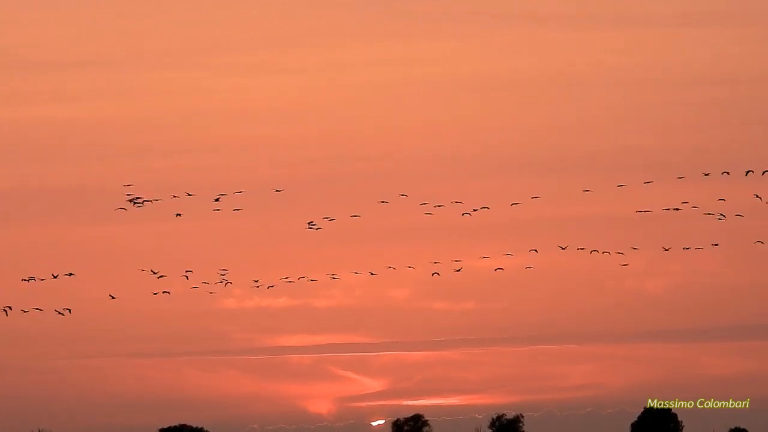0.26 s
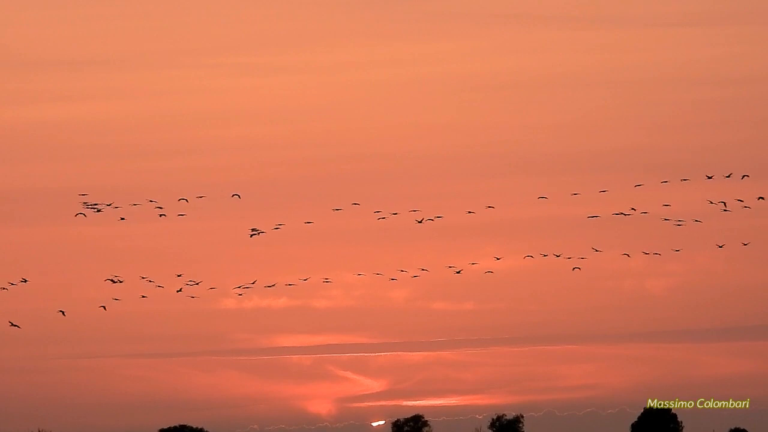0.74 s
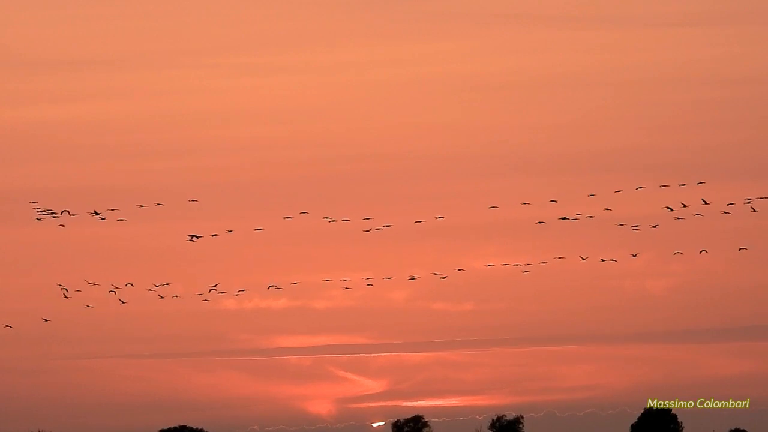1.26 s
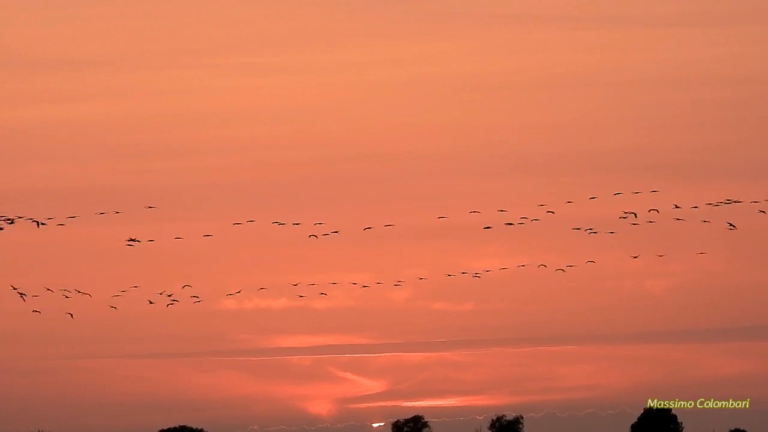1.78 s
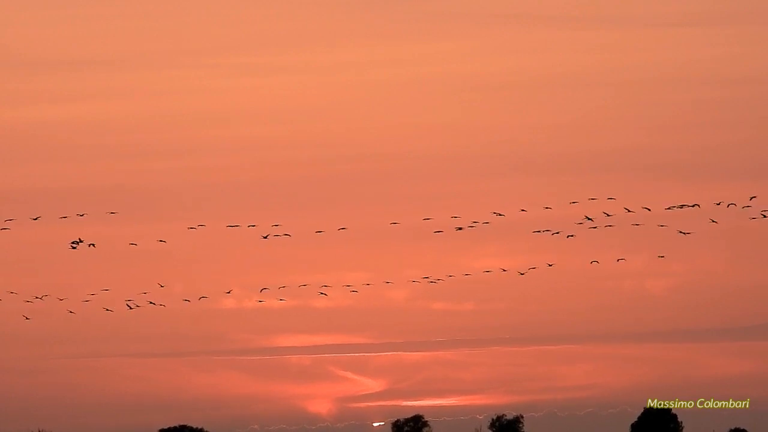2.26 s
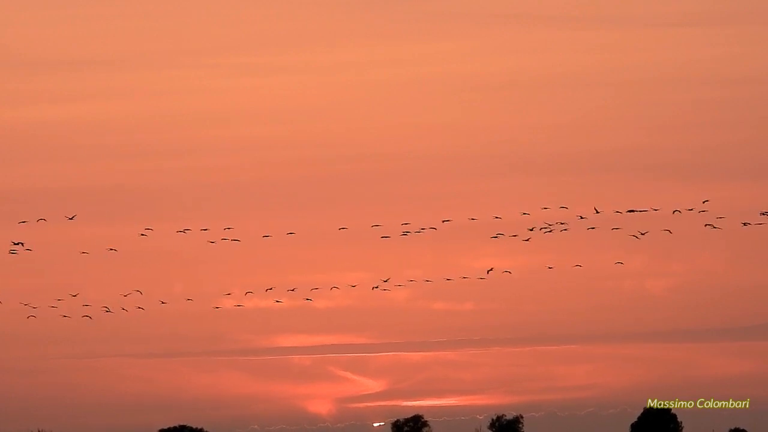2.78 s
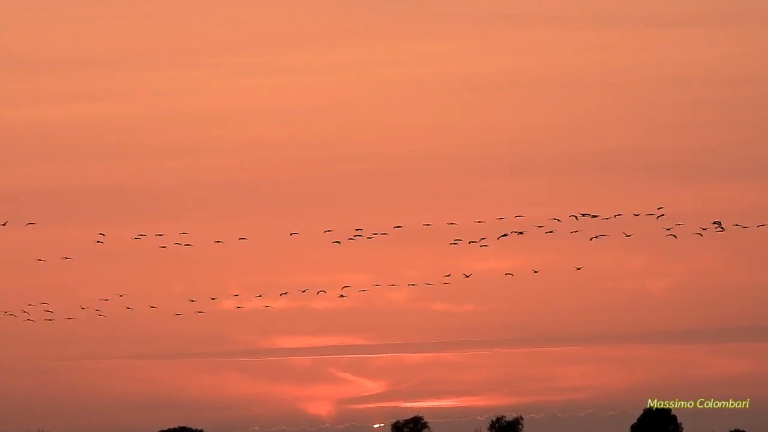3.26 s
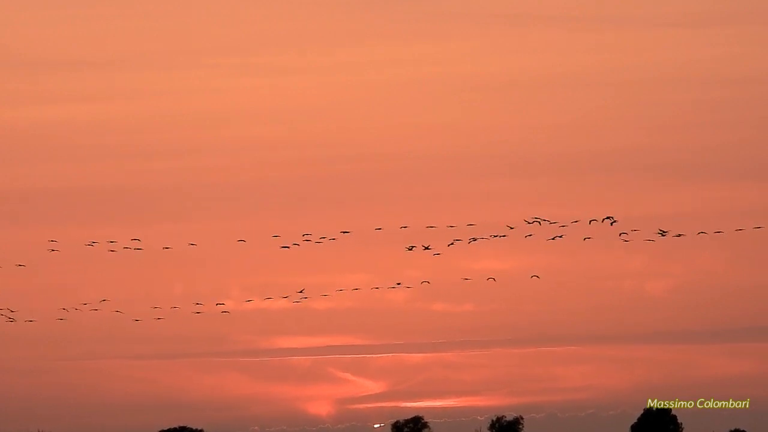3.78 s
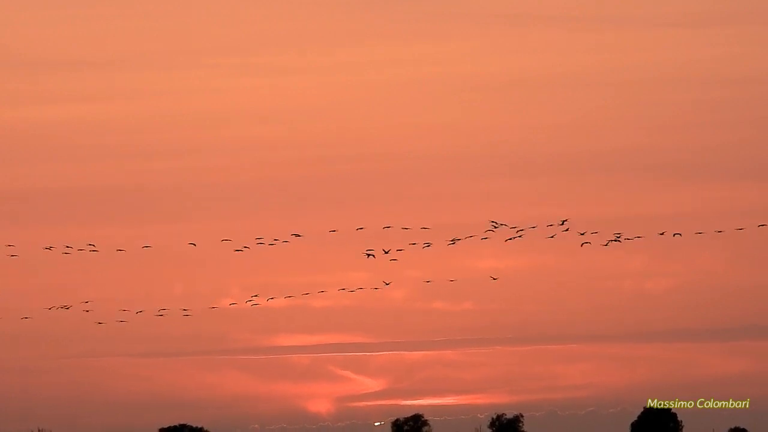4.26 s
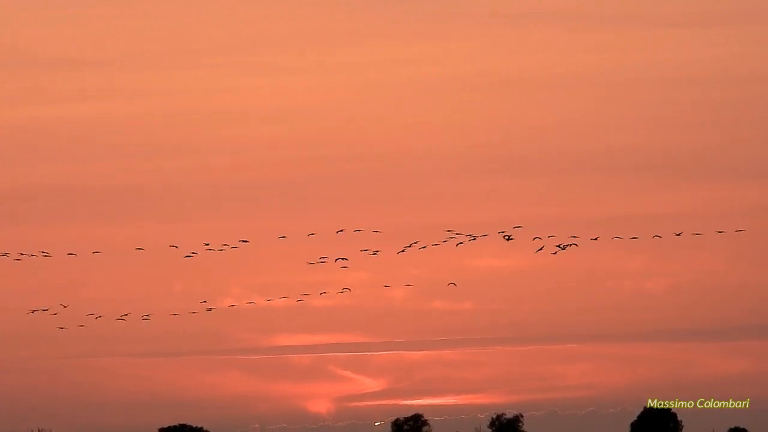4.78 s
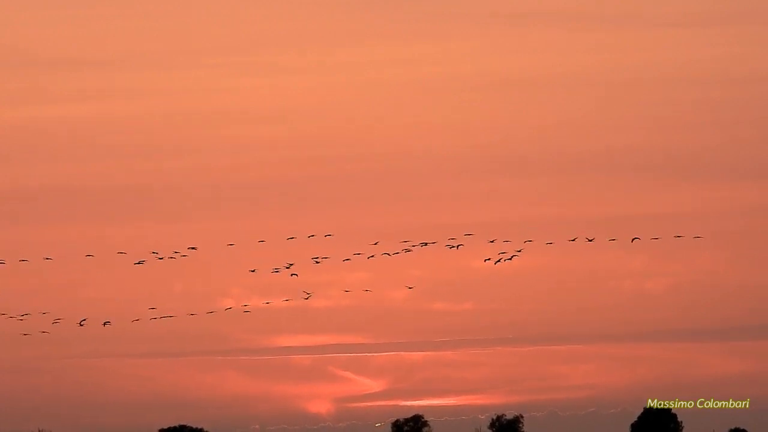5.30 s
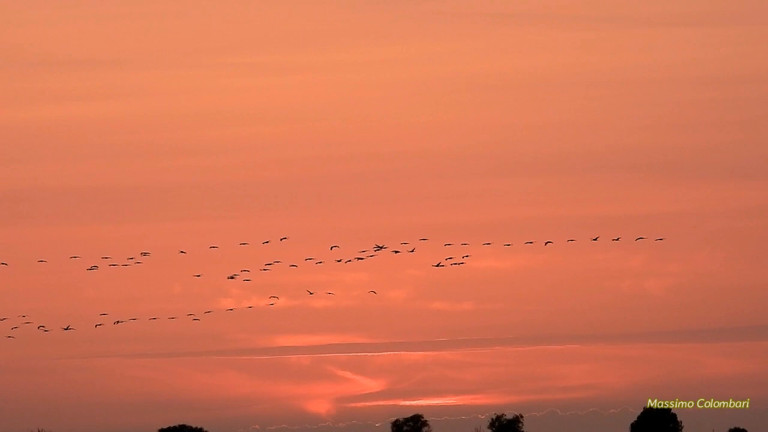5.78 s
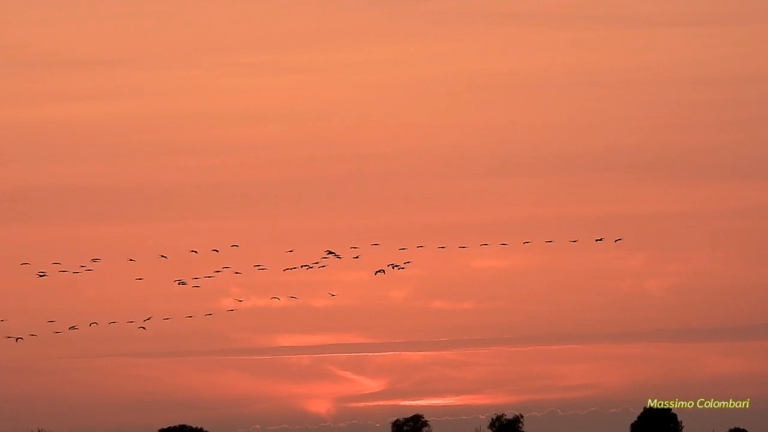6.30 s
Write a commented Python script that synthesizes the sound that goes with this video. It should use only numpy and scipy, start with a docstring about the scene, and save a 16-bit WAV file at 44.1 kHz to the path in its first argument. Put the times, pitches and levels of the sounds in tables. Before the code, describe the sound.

A large flock of cranes flies past, many overlapping rattling trumpet calls and rolled toots over a distant chorus, with thin whistles of young birds.

```python
"""Cranes over open fields

A large flock flies past. Near birds trumpet held notes, rolling toots and bending calls, built from
partials shaped by a windpipe, with rattle and turbulence. Young ones whistle in thin gliding tones,
and many far calls blend into a chorus behind them. Below lie wavering country air and soft low bumps.
Nearly all of it reaches the right channel; both channels hiss faintly."""
import sys
import numpy as np
from scipy import signal
from scipy.fft import rfft, irfft
from scipy.io import wavfile
from scipy.ndimage import uniform_filter1d

SR = 44100
rng = np.random.default_rng(int(sys.argv[2]) if len(sys.argv) > 2 else 0)


def put_to_file(sound):
    """Save the sound as 16-bit audio at rate SR, in the file named by the first command-line argument."""
    columns = np.atleast_2d(sound).T  # one column per channel
    safe = np.clip(columns, -1, 1)
    whole_steps = np.round(safe * 32767)
    wavfile.write(sys.argv[1], SR, whole_steps.astype(np.int16))


N = 288414
TIME = np.arange(N) / SR


def undb(db):
    """Decibels to gain."""
    return 10 ** (np.asarray(db) / 20)


def unit(x):
    """Scale to an average (rms) strength of 1."""
    return x / np.sqrt(np.mean(x ** 2) + 1e-18)


def gain_at(points, hz):
    """Gain of a (f/Hz, level/dB) spectrum at the given frequencies."""
    f, db = np.transpose(points)
    return undb(np.interp(np.log(hz + 1e-3), np.log(f), db))


def noise(points):
    """Noise of rms 1 with the given spectrum."""
    spectrum = rfft(rng.standard_normal(N)) * gain_at(points, np.fft.rfftfreq(N, 1 / SR))
    return unit(irfft(spectrum, N))


def band(x, lo_hz, hi_hz, order=3):
    """Keep mainly the frequencies between two limits."""
    return signal.sosfilt(signal.butter(order, [lo_hz, hi_hz], "band", fs=SR, output="sos"), x)


def wander(t, rate):
    """Random values, rate a second, joined by straight lines."""
    knots = rng.standard_normal(size=512)
    return np.interp(t * rate, np.arange(len(knots)), knots)


def add(track, start, sound):
    """Mix a sound into the track from the given time."""
    i = int(start * SR)
    lo, hi = max(i, 0), min(i + len(sound), N)
    if hi > lo:
        track[lo:hi] += sound[lo - i:hi - i]


def fade(t, rise, fall):
    """Rounded swell from silence and back; rise and fall in seconds."""
    nearest_end = np.minimum(t / rise, (t[-1] - t) / fall)
    return np.sin(np.pi / 2 * np.clip(nearest_end, 0, 1))


def arch(length, first, middle, last, rise, fall):
    """Time, pitch and loudness of one note that bends through three pitches."""
    t = np.arange(int(max(length, .02) * SR)) / SR
    pitch = np.polyval(np.polyfit([0, .5, 1], [first, middle, last], 2), t / t[-1])
    return t, pitch, unit(fade(t, rise, fall))


# microphone hiss: f/Hz, level/dB (per Hz, relative)
HISS_SPECTRUM = [(30, -14), (300, -1), (3000, 1), (8000, 0.5), (12000, -1), (16000, -3.5)]


def hiss():
    """Faint microphone hiss, separate noise in each channel."""
    return undb(-59) * np.array([noise(HISS_SPECTRUM), noise(HISS_SPECTRUM)])


# distant country air: f/Hz, level/dB (per Hz, relative)
AIR_SPECTRUM = [(25, -28), (70, -10), (200, -9.5), (350, -2), (520, 2), (700, 11), (1200, 11.5), (3000, -7),
                (7000, -30)]


def country_air():
    """Shaped noise whose level wavers at random."""
    return undb(-47.5) * noise(AIR_SPECTRUM) * undb(2.66 * wander(TIME, 8.1))


# soft low bumps: t/s, level/dB (relative), decay t/s
BUMP_EVENTS = [(1.05, -59, 0.022), (1.529, -59, 0.069), (1.63, -63, 0.019), (1.9, -60, 0.26),
               (2.629, -55, 0.031), (2.83, -52.5, 0.029), (2.861, -44.5, 0.041), (5.7, -65, 0.37)]


def bumps(ring_db=0, ring_hz=229):
    """Soft dull bumps of low noise; the stronger the bump, the more a low resonance rings."""
    push = np.zeros(N)
    for start, db, decay in BUMP_EVENTS:
        onset = np.clip((TIME - start) / 0.004, 0, 1)
        dying = np.exp(-np.maximum(TIME - start - .02, 0) / decay)
        push += undb(db) * onset * dying
    ring = unit(np.sin(2 * np.pi * np.cumsum(ring_hz * (1 + 0.017 * wander(TIME, 60))) / SR))
    thud = unit(band(rng.standard_normal(N), 70, 490, order=2))
    strength = np.sqrt(push / push.max())
    return push * (undb(ring_db) * strength * ring + (1 - 0.79 * strength) * thud)


def rattle(t, rough, rate_hz=92, uneven=0.2233, depth=0.73, opening=0.34, closing=0.78):
    """A rough throat beats in separate pulses that open fast and die away."""
    cycle = np.cumsum(rate_hz * (1 + uneven * wander(t, 50.5))) / SR % 1
    pulse = np.sin(np.pi / 2 * np.minimum(cycle / opening, 1)) ** 2 * (1 - cycle) ** closing
    share = np.clip(depth * rough, 0, 1)
    return unit(1 - share + share * unit(pulse))


# colour of the voice, strong on low notes, with windpipe resonances dulled by the air:
# f/Hz, level/dB (relative)
WINDPIPE_COLOUR = [(500, 33.5), (800, -1.5), (1080, -2.5), (1350, 6.5), (1650, -5.5), (2200, -3),
                   (2650, -4), (3300, 2), (3800, -8), (4500, -11), (5500, -19), (6500, -29), (8000, -36.5)]


def syrinx(t, pitch, rough, tilt_db, jitter=0.035, jitter_rate=380, shimmer=0.48, shimmer_rate=170,
           fading=0.32, build=0.1, count=8):
    """Fundamental, octave and upper partials (tilt in dB an octave); each call draws its windpipe size."""
    phase = 2 * np.pi * np.cumsum(pitch * (1 + rough * jitter * wander(t, jitter_rate))) / SR
    rasp = np.exp(rough * shimmer * wander(t, shimmer_rate))
    pipe = np.exp(build * (2 * rng.random() - 1))
    partials = []
    for k in range(1, count + 1):
        heard_hz = k * pitch * (pipe if k > 2 else 1)
        gain = gain_at(WINDPIPE_COLOUR, heard_hz) * undb(tilt_db * np.log2(k))
        # turbulent air makes each partial fade on its own
        gain = gain * np.exp(fading * (.5 + rough) * wander(t, 44.2))
        partials.append(rasp * gain * np.sin(k * phase + 2 * np.pi * rng.random()))
    return partials[0], partials[1], sum(partials[2:])


# chorus of the far birds, levels relative:
# t/s, fundamentals level/dB, overtones level/dB
CHORUS_LEVELS = [(0.0, -30.5, -39.5), (0.22, -37.5, -39), (0.36, -41.5, -49.5), (1.049, -42, -49.5),
                 (1.24, -33, -39.5), (1.55, -40, -51), (1.721, -32.5, -38.5), (1.88, -40.5, -54),
                 (2.05, -37.5, -43.5), (2.39, -35, -39.5), (2.55, -40, -42.5), (2.9, -39.5, -46),
                 (3.15, -40, -48), (3.3, -38.5, -42.5), (3.55, -35, -43), (3.7, -45.5, -47),
                 (3.8, -36.5, -40.5), (3.97, -36.5, -38.5), (4.15, -36.5, -42), (4.3, -46, -52),
                 (4.57, -36.5, -47.5), (4.75, -44.5, -49), (5.43, -43, -46.5), (5.57, -37.5, -38),
                 (5.78, -39, -47), (5.95, -36, -42.5), (6.12, -40.5, -49), (6.25, -49, -48.5),
                 (6.41, -45, -64), (6.54, -41.5, -50)]
CHORUS_DB, CHORUS_OVER_DB = -4.5, -4.5  # added to the two level columns


def chorus(low_hz=835, high_hz=1020, spread=.062, roll_rate=23, rough=0.593, far_tilt_db=-3, count=200):
    """Many far birds, low and high voices in turn; each call starts rolled and ends held."""
    lows, highs = np.zeros(N), np.zeros(N)
    for k in range(count):
        place, span, grit = rng.random(size=3)
        tune, size = rng.standard_normal(2)
        hz = (low_hz, high_hz)[k % 2] * np.exp(spread * np.clip(tune, -2, 2))
        call_rough = rough * (.5 + grit)
        t, pitch, swell = arch(.14 + .14 * span, hz, hz, .92 * hz, rise=0.0022, fall=0.049)
        rolled = np.clip(1.38 * (1 - t / t[-1]), 0, 1)
        swell = swell * undb(0.5 * size) * (1 - rolled * np.sin(np.pi * roll_rate * t) ** 2)
        swell = swell * rattle(t, call_rough)
        low, octave, upper = syrinx(t, pitch, call_rough, far_tilt_db)
        start = (k + place) / count * (N / SR + .2) - .2  # the first may already be under way
        add(lows, start, swell * low)
        add(highs, start, swell * (octave + upper))
    s, low_levels, over_levels = np.transpose(CHORUS_LEVELS)
    db, over_db = np.interp(TIME, s, low_levels), np.interp(TIME, s, over_levels)
    # even out both layers, then let the table set their levels
    lows, highs = (v / np.sqrt(uniform_filter1d(v ** 2, size=SR // 16) + 1e-6) for v in (lows, highs))
    return undb(db + CHORUS_DB) * lows + undb(over_db + CHORUS_OVER_DB) * highs


def peep(length, top_hz, rise, drop, quaver=0.019, flutter_db=3):
    """One thin quavering tone that glides through its top pitch; rise and drop are shares of it."""
    t, pitch, swell = arch(length, top_hz * (1 - rise), top_hz, top_hz * (1 - drop), rise=0.002, fall=0.016)
    phase = 2 * np.pi * np.cumsum(pitch * (1 + quaver * wander(t, 412))) / SR
    return swell * unit(undb(flutter_db * wander(t, 183)) * np.sin(phase))


# whistles of the young, quick rising peeps and then one longer or shorter slur:
# start t/s, peeps [count], slur length t/s, top f/Hz (before the arch of the train),
# slur rise, slur fall [shares of the top pitch; negative bends the other way], level/dB (relative)
WHISTLE_CALLS = [(.346, 2, .03, 4100, .1, .05, -54), (.488, 0, .022, 3850, .02, .1, -49.5),
                 (.625, 4, .05, 4850, -.03, .16, -48.5), (4.552, 2, .08, 4850, -.02, .22, -47.5),
                 (4.74, 0, .19, 3930, .12, .13, -54), (6.04, 0, .05, 4510, -.01, -.01, -55),
                 (6.1, 0, .052, 4720, .07, -.05, -55), (6.145, 0, .095, 4220, -.09, .17, -55.5)]
PEEP_S = .038  # length and spacing of the peeps, seconds
PEEP_RISE, PEEP_DROP, WHISTLE_ARCH = .2, .01, .11  # shares of the top pitch


def whistles(level_db=-2.0, swell_db=1):
    """Young birds: a train of rising peeps arches in pitch, grows louder and ends in a slur."""
    out = np.zeros(N)
    for start, count, length, top_hz, rise, fall, db in WHISTLE_CALLS:
        for k in range(count + 1):
            hz = top_hz * (1 - WHISTLE_ARCH * ((2 * k - count) / max(count, 1)) ** 2)
            if k < count:
                tone = peep(PEEP_S, hz, PEEP_RISE, PEEP_DROP)
            else:
                tone = peep(length, hz, rise, fall)
            add(out, start + k * PEEP_S, undb(db + level_db + swell_db * (k - count / 2)) * tone)
    return out


def voice(t, pitch, rough, octave_db, upper_db, own_tilt_db, tilt_db=4, blare=0.32):
    """One near bird; blown harder its brass reaches higher, and a rough voice breaks into turbulence."""
    rough = np.clip(rough, 0, 1)
    slope_db = tilt_db + own_tilt_db + blare * upper_db
    low, octave, upper = syrinx(t, pitch, rough ** 1.3, slope_db)
    # puffs of air pass through the same windpipe as the overtones
    hz = np.fft.rfftfreq(len(t), 1 / SR)
    colour = gain_at(WINDPIPE_COLOUR, hz) * undb(slope_db * np.log2(1 + hz / pitch[0]))
    colour = colour * (hz > 1.2 * pitch[0]) * (hz < 8000)
    turbulence = irfft(rfft(rng.standard_normal(len(t))) * colour, len(t))
    share = np.clip(rough - .55, 0, 1)  # only rough voices turn partly to noise
    brass = np.sqrt(1 - share) * unit(upper) + np.sqrt(share) * unit(turbulence)
    return rattle(t, rough) * (unit(low) + undb(octave_db) * unit(octave) + undb(upper_db) * brass)


# a note scoops up to its pitch, holds it, and falls as the pressure runs out
SCOOP, SCOOP_S, FALL_POWER = 0.025, 0.0114, 2.81  # share of the pitch, seconds, curve
ATTACK_S, RELEASE_S = 0.0031, 0.025
# a toot is a short note; its fall is a share of the pitch
TOOT_S, TOOT_ATTACK_S, TOOT_RELEASE_S, TOOT_FALL = 0.014, 0.0017, 0.0047, 0.0051


def note(length, hz, scoop, fall, octave_db, upper_db, rough, attack, release, tilt_db=0,
         clear_db=2, waver=0.0014, rough_waver=0.01167, waver_rate=45):
    """One trumpeted note; a clear voice rings with more brass, a rough one wavers more."""
    t = np.arange(int(max(length, .005) * SR)) / SR
    drift = (waver + rough_waver * rough ** 2) * wander(t, waver_rate)
    pitch = hz * (1 - scoop * np.exp(-t / SCOOP_S) - fall * (t / t[-1]) ** FALL_POWER + drift)
    ring_db = clear_db * np.clip(1 - 2 * rough, 0, 1)
    return unit(fade(t, attack, release)) * voice(t, pitch, rough, octave_db, upper_db + ring_db, tilt_db)


# plain one-note cries, levels relative: start t/s, length t/s, pitch f/Hz, final fall [share of pitch],
# level/dB, octave level/dB, upper partials level/dB, roughness [0 = clear, 1 = rough, can exceed 1]
CRY_NOTES = [(0, 0.083, 1087, 0.14, -38, -10, -11, 0.45), (.005, 0.16, 791, 0.06, -44, -7, -24, 0.86),
             (0.328, 0.13, 1038, 0, -41.5, -24, -7, 1.18), (0.556, 0.15, 803, 0.04, -48.5, 1.5, -1.5, 0.82),
             (0.68, 0.15, 690.5, 0.08, -47, -24, -6, 0.73), (0.858, 0.16, 1046, 0.26, -45, -28, -43, 0.4),
             (1.205, 0.044, 1300, 0.1, -41, -23, -26, 1), (1.68, 0.12, 815, 0.18, -43.5, -17, -5, 0.51),
             (1.798, 0.067, 686.3, 0.06, -45.5, -11, -1, 0.74),
             (2.279, 0.15, 988, 0.06, -40.5, -19, -8, 0.63),
             (2.639, 0.24, 697, 0.01, -45.5, -16, -8.5, 0.97),
             (2.57, 0.14, 799, 0.08, -49.5, -6, -5.5, 0.2), (2.72, 0.068, 971, 0.16, -50.5, 0.5, -6, 0.37),
             (2.827, 0.12, 1084, 0.06, -37.5, -18, -30, 0.99),
             (2.931, 0.19, 1040, 0.07, -40, -15.5, -13, 0.45),
             (3.555, .125, 811.6, 0.03, -46, -4, -8, 0.35), (4.019, .1, 1083, 0.18, -36.5, -11, -15, 0.37),
             (3.984, 0.054, 1328, 0.37, -38, -29, -4, 0.94), (4.06, 0.285, 815, 0.03, -53, 1.5, 0, 0.1),
             (4.386, 0.2, 875, 0.02, -47, 1.5, 0.5, 0.68), (4.66, 0.126, 890, 0.11, -59, 1.5, -16, 0.2),
             (4.682, 0.18, 798, 0.07, -46, -28, -26, 0.82),
             (4.711, .19, 495, 0.14, -60.5, -17, -21.5, 0.34),
             (4.943, 0.22, 1035, 0.13, -43.5, -12, -12, 0.67),
             (5.045, 0.16, 777, 0.05, -45, -9, -4.5, 0.83),
             (5.29, 0.19, 808.6, 0.02, -52.5, -0.5, -14, 0.12),
             (5.72, 0.17, 799, 0.01, -47, -8, -9.5, 0.05), (5.862, 0.26, 517.5, 0.12, -58, -10, 0, .6),
             (5.881, 0.32, 1120, 0, -49, -14, -18, 0.35), (6.432, 0.11, 947, 0.12, -47, -7, -0.5, 1.35)]


def cries(level_db=0.45, swell_share=0.04):
    """Single held notes of the near birds; long rough ones swell in more slowly."""
    out = np.zeros(N)
    for start, length, hz, fall, db, octave_db, upper_db, rough in CRY_NOTES:
        attack = ATTACK_S + swell_share * length * rough
        cry = note(length, hz, SCOOP, fall, octave_db, upper_db, rough, attack, RELEASE_S)
        add(out, start, undb(db + level_db) * cry)
    return out


# lone toots and stutters, levels relative: start t/s, length t/s, pitch f/Hz, level/dB,
# upper partials level/dB, roughness [0-1]
TOOT_NOTES = [(0.36, 0.0095, 1010, -43, -2, 0.4), (0.856, 0.024, 1095, -41, -33, 0.36),
              (0.902, 0.018, 1073, -39.5, -24, 0.5), (1.047, 0.017, 860, -38.5, -14.5, 0.4),
              (1.084, 0.012, 812, -34.5, -14, .3), (1.117, 0.013, 898, -34, -15, 0.7),
              (1.132, 0.0086, 900, -33, -10.5, 0.8), (1.375, 0.01, 1094, -35, -6, 0.6),
              (1.579, 0.0081, 990, -39.5, -10, .5), (1.768, 0.019, 807, -37.5, -4, 0.55),
              (2.276, 0.0085, 1000, -48, -3, 0.8), (2.294, 0.0074, 1000, -43, -2, 0.86),
              (2.353, .01, 1050, -44, 3.5, 0.8), (2.385, 0.01, 1082, -45, 4.5, 0.9),
              (2.415, .008, 1037, -44, 3, .7), (2.433, 0.0074, 1000, -43, -4, 0.4),
              (2.518, 0.0053, 1030, -35.5, -25, 0.5), (3.431, 0.017, 1142, -36, -3.5, 0.9),
              (3.448, 0.022, 1104, -38, -3, 0.9), (3.47, 0.017, 1160, -36.5, -1, 0.9),
              (3.487, 0.011, 1107, -38, -22, 0.7), (3.51, 0.015, 1103, -43, 4, 0.9),
              (3.526, 0.0096, 1164, -48, 5, 0.9), (3.539, 0.0076, 1190, -54, 11, 0.7),
              (3.564, 0.0089, 1108, -51, 6, 0.6), (3.582, .008, 1120, -54, 0, .7),
              (4.489, 0.023, 1038, -34.5, -11.5, 0.7), (5.415, 0.0085, 1104, -32.5, -9, 0.5),
              (5.224, .008, 886, -48.5, 0, .6), (6.481, 0.007, 1026, -36.5, -10, 0.65)]
TOOT_OCTAVE_DB = -13


def toots(level_db=-1, release_s=0.004):
    """Short barks of the near birds, alone or in an uneven stutter."""
    out = np.zeros(N)
    for start, length, hz, db, upper_db, rough in TOOT_NOTES:
        toot = note(length, hz, SCOOP, TOOT_FALL, TOOT_OCTAVE_DB, upper_db, rough, TOOT_ATTACK_S, release_s)
        add(out, start, undb(db + level_db) * toot)
    return out


# long calls that bend, swell or yodel in one breath, levels relative:
# octave level/dB, upper partials level/dB, their tilt [dB an octave, added to the voice's own],
# roughness [0-1], beating [0-1], course [list of t/s, pitch f/Hz, level/dB]
BENT_CALLS = [(-19, -20, -5, 0.14, .3, [(2.53, 1050, -50), (2.6, 1075, -46), (2.67, 1045, -37),
              (2.71, 1000, -38), (2.75, 933, -43), (2.8, 880, -51)]),
              (-6.5, -4.5, 6, 0.56, 0.6, [(3.285, 884, -48), (3.33, 886, -42.5), (3.39, 877, -39),
              (3.42, 856, -39.5), (3.445, 860, -46)]), (-7, -8, 2, 0.4, .6, [(3.752, 1091, -39),
              (3.79, 1045, -46.5), (3.85, 1100, -42.5), (3.9, 1119, -33.5), (3.922, 1051, -37.5),
              (3.95, 1122, -32.5), (3.975, 1044, -35.5), (3.995, 1060, -45)]),
              (-8.5, -7.5, -0.5, 0.34, 0.53, [(4.53, 893, -39), (4.561, 896, -37), (4.595, 947, -39),
              (4.62, 988, -34.5), (4.634, 941, -38), (4.65, 843, -35.5), (4.67, 870, -42)]),
              (-9.5, -10, 3.5, 0.43, 0.43, [(5.424, 1059, -36), (5.452, 1105, -30), (5.473, 1115, -30.5),
              (5.496, 1045, -32), (5.512, 1118, -31), (5.536, 1188, -32.5), (5.556, 1085, -32.5),
              (5.574, 1124, -30), (5.595, 1152, -31), (5.624, 1060, -34), (5.66, 1008, -38.5),
              (5.7, 986, -39)])]


def bends(level_db=0):
    """Unbroken calls of the nearest birds: pitch and loudness rise and sink with the pressure."""
    out = np.zeros(N)
    for octave_db, upper_db, tilt_db, rough, beat, course in BENT_CALLS:
        s, hz, db = np.transpose(course)
        t = np.arange(int((s[-1] - s[0]) * SR)) / SR
        ends = np.clip(np.minimum(t / ATTACK_S, (t[-1] - t) / RELEASE_S), 0, 1)
        swell = undb(np.interp(s[0] + t, s, db) + level_db) * ends
        pitch = uniform_filter1d(np.interp(s[0] + t, s, hz), size=SR // 100)  # rounds the corners
        add(out, s[0], swell * rattle(t, beat) * voice(t, pitch, rough, octave_db, upper_db, tilt_db))
    return out


# slurred notes swoop further (shares of the pitch); a rough, strained voice widens the swoop
YODEL_SCOOP, YODEL_FALL, YODEL_STRAIN = 0.049, 0.017, 3.5
# a roll opens flat (share of the pitch), soft and dull
OPENING_FLAT, OPENING_DB, OPENING_DULL_DB = 0.0055, -2, -1.5
# rolled calls, a run of toots that ends in a held note, levels relative:
# start t/s, toots [count], toot spacing t/s, slur [0-1], toot accent level/dB, held t/s, pitch f/Hz,
# final fall [share of pitch], level/dB, octave level/dB, upper partials level/dB,
# their tilt [dB an octave, added to the voice's own], roughness [0-1]
ROLLED_CALLS = [(.079, 3, 0.042, 0.33, -2, 0.08, 829.5, 0.12, -33.5, -14, -7.5, -10, 0.5),
                (0.514, 3, 0.047, 0, 5, 0.135, 1092, 0.09, -40.5, -4, -9.5, 6, 0.15),
                (1.161, 1, 0.033, 0.16, 9, 0.098, 903, 0.04, -47, -5, -4.5, 6, 1),
                (1.297, 2, 0.042, 0, 2.5, 0.089, 1084, 0.16, -32.5, -23, -12.5, 8, 0.5),
                (1.566, 3, 0.05, 0, 2.5, 0.0837, 1073, 0.05, -37, -5.5, -4, -1.5, 0.35),
                (1.899, 2, 0.065, 0.66, 3.5, 0.071, 1099, 0.07, -36, -16, -17, 5, 0.11),
                (2.147, 3, 0.038, 0.36, 5, 0.075, 810, 0, -43, -6, -3, 6.5, 0.59),
                (2.352, 1, 0.033, 0, 5, 0.088, 1088, 0.03, -33.5, -23, -13, 3, 0.61),
                (2.507, 1, 0.04, 0.28, 5, 0.06, 1053, 0.1, -39, -12, -13, 1, 0.56),
                (3.128, 1, 0.047, 0.07, 9, 0.037, 939, 0.14, -39, -12.5, -11.5, 1, 0.9),
                (3.692, 2, .041, 0.04, 9, 0.088, 978, 0.01, -42.5, -19, -15, -3, 0.9),
                (4.32, 3, 0.048, 0.07, 3, 0.012, 1051, 0, -35.5, -12.5, -13.5, 6, 0.2),
                (6.161, 3, 0.044, 0.82, 0, 0.069, 838.5, 0.045, -36.5, -10, -5.5, 2, 0.18),
                (6.409, 2, 0.05, 0.12, -2.5, 0.085, 1102, 0.44, -31, -12, -14.5, -2, 0.7)]


def rolls(level_db=-3.0, toot_rough=0.74, toot_bright_db=0.0, punch=0.99, punch_s=0.011,
          slur_attack_s=0.0033):
    """The syrinx opens in even, brassy toots, then stays open; slurred toots join into a swooping yodel."""
    out = np.zeros(N)
    for (start, count, spacing, slur, accent_db, held, hz, fall,
         db, octave_db, upper_db, tilt_db, rough) in ROLLED_CALLS:
        length = TOOT_S + slur * (spacing - TOOT_S)
        grit = rough + (1 - slur) * toot_rough
        swoop = slur * (1 + YODEL_STRAIN * rough)
        scoop, attack = SCOOP + swoop * YODEL_SCOOP, TOOT_ATTACK_S + slur * slur_attack_s
        for k in range(count):
            opening = k == 0
            brass_db = upper_db + (1 - slur) * toot_bright_db + opening * OPENING_DULL_DB
            toot = note(length, hz * (1 - opening * OPENING_FLAT), scoop, TOOT_FALL + swoop * YODEL_FALL,
                        octave_db, brass_db, grit, attack, TOOT_RELEASE_S, tilt_db)
            add(out, start + k * spacing, undb(db + accent_db + opening * OPENING_DB) * toot)
        last = note(held, hz, scoop, fall, octave_db, upper_db, rough, attack, RELEASE_S, tilt_db)
        # the held note starts with a punch, less so when slurred
        accent = 1 + (1 - slur) * punch * np.exp(-np.arange(len(last)) / SR / punch_s)
        add(out, start + count * spacing, undb(db) * accent * last)
    return undb(level_db) * out


def fields(x, ground_s=.0065, ground_db=-12, scatter_db=-11, t60=0.28):
    """One bounce off the ground and a thin, dull scatter from trees."""
    t = np.arange(SR) / SR
    tail = band(rng.standard_normal(SR), 110, 9300, order=1)
    tail = tail * np.exp(-np.log(1000) * t / t60) * np.minimum(t / 0.026, 1)
    scatter = signal.fftconvolve(x, tail / np.sqrt(np.sum(tail ** 2)))[:N]
    delay = ground_s * (1 + 0.1266 * wander(TIME, 3))  # the bounce's delay drifts slowly at random
    bounce = np.interp(TIME - delay, TIME, band(x, 460, 9300, order=1), left=0)
    return x + undb(ground_db) * bounce + undb(scatter_db) * scatter


# lower and upper limit of the birds' sound, with a steep cut beyond each
BIRDS_LOW_HZ, BIRDS_TOP_HZ = 375, 7860
# gain of the stereo input: left level/dB, right level/dB
CHANNEL_DB = (-52, 6.5)


def scene():
    """Birds, air and bumps on a lopsided stereo input, over its hiss."""
    birds = fields(cries() + rolls() + toots() + bends() + whistles() + chorus())
    birds = band(birds, BIRDS_LOW_HZ, BIRDS_TOP_HZ, order=6)
    heard = birds + country_air() + bumps()
    return undb(CHANNEL_DB)[:, None] * heard + hiss()


def record(dry, top_hz=15750):
    """The recorder cuts the top with a steep low-pass."""
    return signal.sosfilt(signal.ellip(10, .2, 80, top_hz, fs=SR, output="sos"), dry)


dry = scene()
out = record(dry)
put_to_file(out)
```